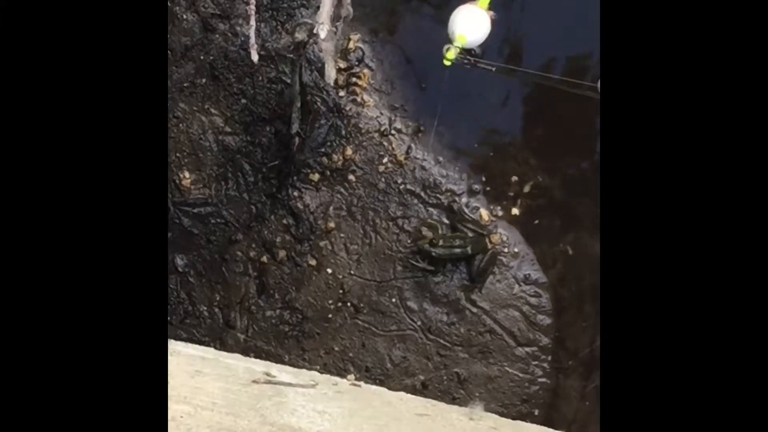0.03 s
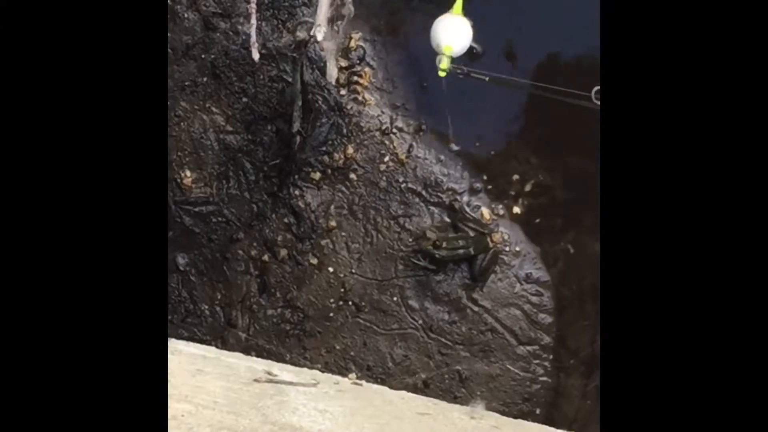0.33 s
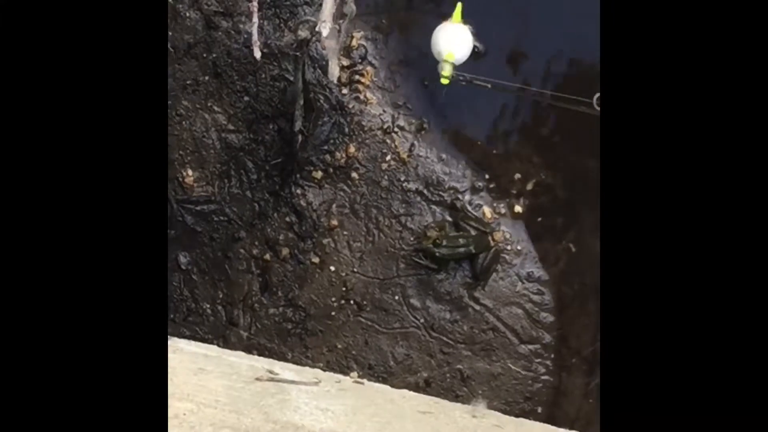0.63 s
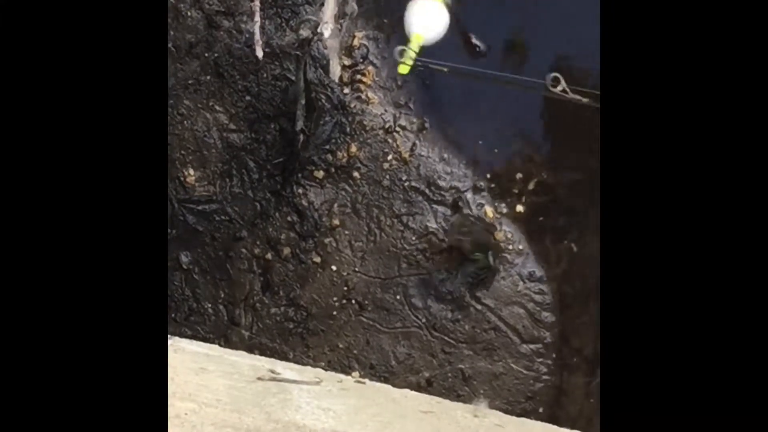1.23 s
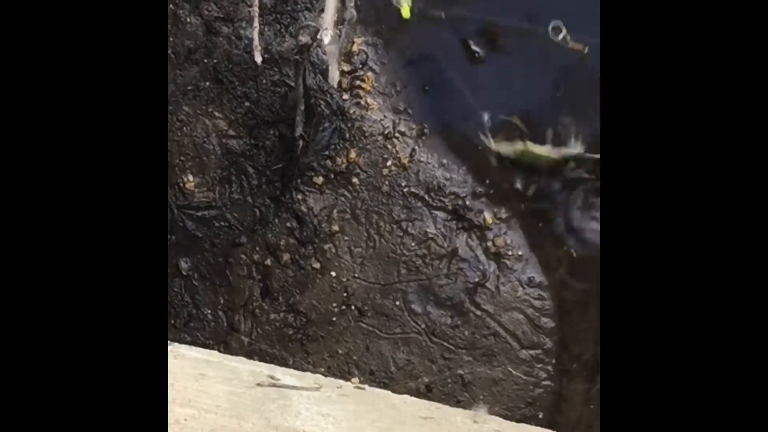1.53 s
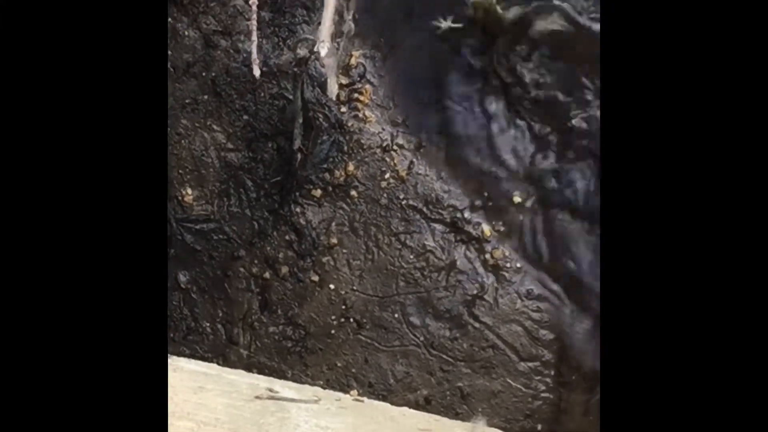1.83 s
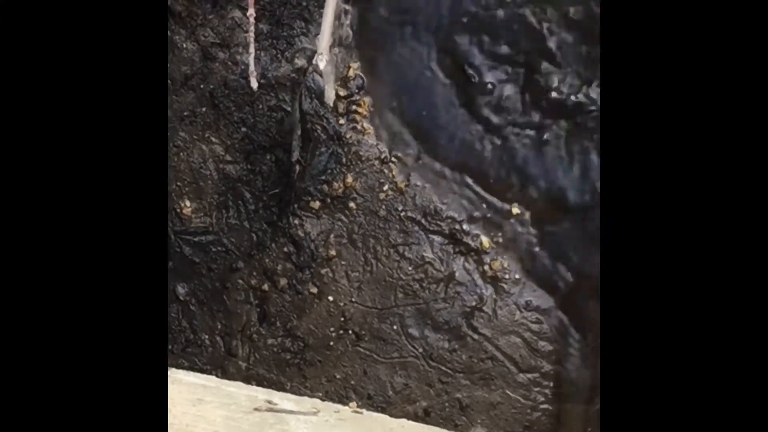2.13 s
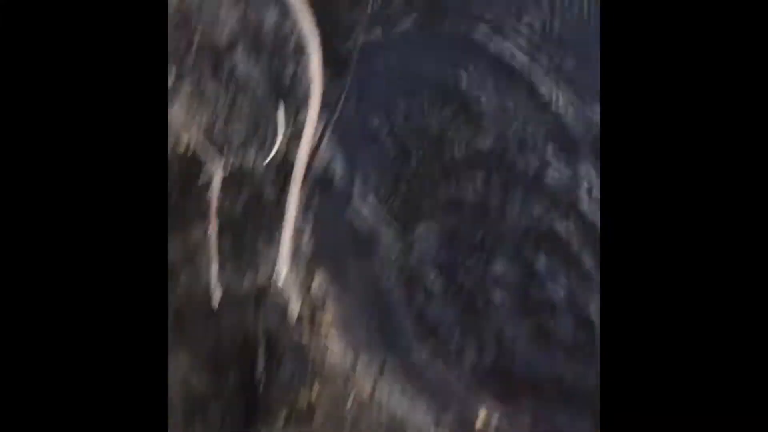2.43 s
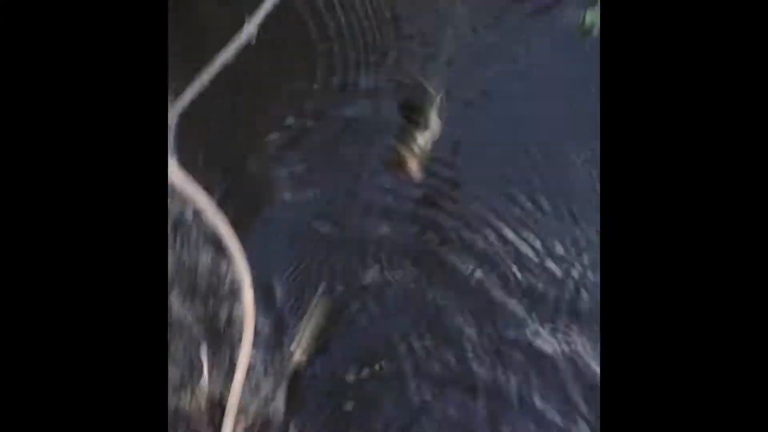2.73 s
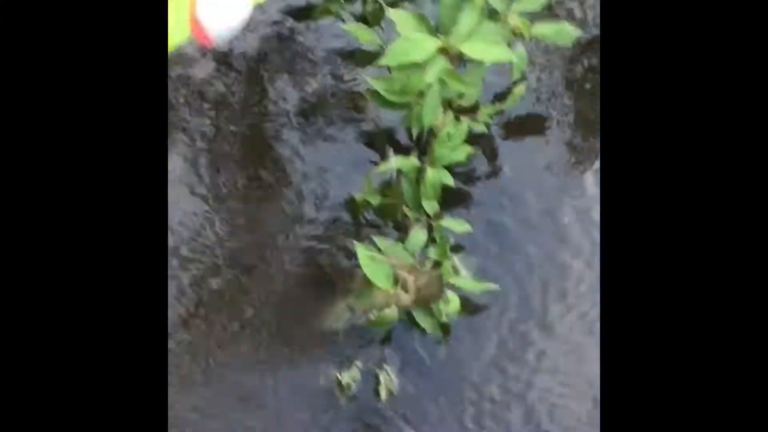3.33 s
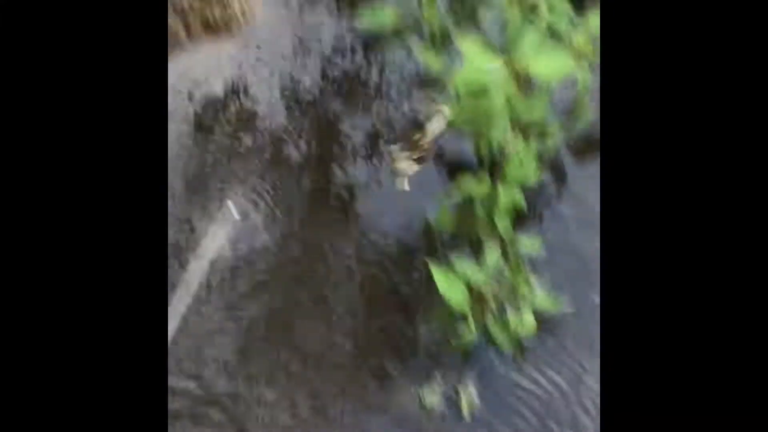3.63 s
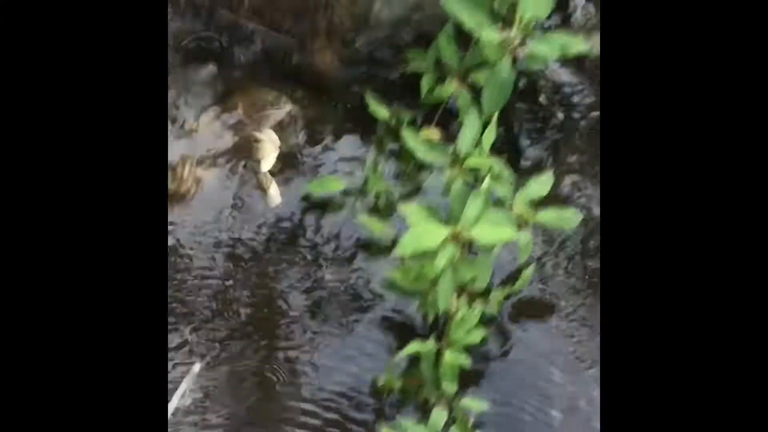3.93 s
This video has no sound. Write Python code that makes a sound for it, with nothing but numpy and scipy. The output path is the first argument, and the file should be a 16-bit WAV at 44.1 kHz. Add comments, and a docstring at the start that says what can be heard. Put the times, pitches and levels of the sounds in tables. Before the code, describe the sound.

A frog leaps into a pond with light splashy ticks and one rising plop, then skitters through wet weeds. Birds whistle during the first half, over steady outdoor hiss and dull thumps on a hand-held microphone.

```python
"""At a pond among trees, a frog leaps off a muddy bank: droplets tick as they ring tiny air pockets,
one large bubble plops with a rising pitch, small ones gurgle, and later the frog skitters through
wet weeds. A songbird whistles in gliding tones and a thinner bird trills further off, both
scattered by trunks and leaves. The hand-held microphone picks up brushing, dull thumps,
the low turbulence of soft gusts and a steady outdoor hiss."""
import sys
import numpy as np
from scipy import signal
from scipy.fft import rfft, irfft
from scipy.io import wavfile

SR = 44100
rng = np.random.default_rng(int(sys.argv[2]) if len(sys.argv) > 2 else 0)


def persist_wave(psi):
    """Save psi, clipped to +-1, as 16-bit WAV."""
    counts = np.round(np.clip(psi, -1, 1) * 32767).astype(np.int16)
    wavfile.write(sys.argv[1], SR, np.atleast_2d(counts).T)


N = 176400
T = np.arange(N) / SR


# Ticks of droplets striking the water, the first (1.482 s) being the frog's push-off from the bank: start_s,
# level_db, pitch_hz, decay_s, noise_share
DROPLETS = [(1.482, -52.5, 5450, 0.0043, 0.5), (1.5212, -40.5, 11400, 0.0014, 0.72),
            (1.525, -49, 12500, 0.0014, 0.7), (1.6485, -48, 13130, 0.0014, .8),
            (1.654, -48, 11800, 0.0032, 0.66), (1.678, -52.5, 5520, 0.0035, 0.28),
            (1.695, -49, 9700, 0.00098, 0.6), (1.7803, -39.5, 10000, 0.0011, 0.78),
            (1.7817, -30, 7410, 0.0015, 0.67), (1.7824, -36.5, 11200, 0.0018, .9),
            (1.7935, -46, 4450, 0.0032, 0.87), (1.9656, -27, 12860, 0.0005, 0.42),
            (1.9657, -37, 6890, 0.00053, 0.06), (1.9675, -37, 6850, .0016, 0.77),
            (1.970, -29.5, 6700, 0.00057, 0.03), (1.974, -43.5, 5500, 0.0036, 0.96),
            (1.9835, -41.5, 10000, 0.0023, 1), (2.039, -51.5, 6880, 0.0018, 0.3),
            (2.269, -55.5, 4380, 0.011, 0.03), (2.567, -51.5, 5520, 0.0069, 0.1),
            (2.619, -49.5, 5530, 0.0068, 0.42)]
# Spectrum of their splash noise: frequency_hz, gain_db
DROPLET_SPECTRUM = [(1500, -24), (3500, 1), (5000, -3.5), (7000, 2.5), (10000, -1.5), (13500, -0.5),
                    (16000, -6)]

def droplets():
    """Air entrainment: falling drops trap pockets so small that they ring as high ticks."""
    return splashes(DROPLETS, DROPLET_SPECTRUM, width=0.76, sag=0, spray_db=-18)


def plop():
    """Bubble resonance: a cavity pinches off with a tick and rises in pitch as it nears the surface."""
    start_s, length_s, decay_s = 2.0545, 0.053, 0.028
    start_hz, end_hz, sustain = 656, 1513, 0.23
    t = T[:int(length_s * SR)]
    progress = t / length_s
    hz = start_hz + (end_hz - start_hz) * progress ** 2.57
    envelope = (sustain + (1 - sustain) * np.exp(-(t / decay_s) ** 3)) * swell(t, length_s, 0.0042)
    tremble = undb(2 * progress * wander(245)[:len(t)])
    ring = tone(hz) * envelope * tremble
    tick = unit(resonance(rng.standard_normal(len(t)), hz=1510, width=0.68))
    tick *= np.exp(-t / 0.0016) * swell(t, length_s, 0.00025)
    tick *= np.sin(np.pi * np.minimum(t / 0.0032, 1))
    out = np.zeros(N)
    add(out, start_s, undb(-35) * ring + undb(-39) * tick)
    bank_echo = undb(-10.5) * np.roll(out, int(0.00688 * SR))
    return out + bank_echo


# Bubble clouds in the stirred water: centre_s, spread_s, bubble_count, typical_hz, bubble_level_db
BUBBLE_CLOUDS = [(1.98, .012, 16, 2400, -58), (2.004, .012, 18, 1550, -61), (2.556, .014, 22, 12500, -56),
                 (2.8, .085, 90, 1350, -67), (2.755, .015, 14, 4300, -63)]

def gurgles():
    """Damped oscillation: every bubble rings for as many cycles, so the high ones die soonest."""
    decay_cycles, pitch_spread, rise = 8.2, 0.196, 0.015
    out, t = np.zeros(N), T[:SR // 20]
    for centre_s, spread_s, count, hz, db in BUBBLE_CLOUDS:
        for when, detune, strength in rng.standard_normal((int(count), 3)):
            cycles = hz * np.exp(pitch_spread * detune) * t
            age = cycles / decay_cycles
            ring = np.exp(-age) * np.sin(2 * np.pi * cycles * (1 + rise * age))
            add(out, centre_s + spread_s * when, undb(db + 2 * strength) * ring)
    return out


# Wet slaps of the frog in the weeds: start_s, level_db, pitch_hz, decay_s, noise_share
SLAPS = [(3.679, -42, 3330, 0.0018, 0.35), (3.689, -43, 1800, .0015, 1), (3.6925, -38, 3040, 0.0027, 0.6),
         (3.7044, -32.5, 1150, 0.0013, 0.02), (3.7295, -30, 1250, 0.0017, 0.55),
         (3.7352, -33.5, 3450, 0.002, 0.6), (3.745, -35, 1060, 0.0018, 0.35),
         (3.7498, -37, 4160, 0.00083, 0.44), (3.7552, -42, 4260, .0016, .55),
         (3.795, -44.5, 3000, 0.00092, 0.8)]
# Two kicks that churn the water: centre_s, half_width_s, level_db
KICKS = [(3.689, 0.039, -55.5), (3.748, 0.028, -53.5)]
# Spectrum of the slap and slosh noise: frequency_hz, gain_db
SLAP_SPECTRUM = [(400, -22), (800, -6), (1150, 3), (2000, -1.5), (3500, 0.5), (6000, -8.5), (7200, -18.5),
                 (16000, -37)]

def skitter():
    """Cavity resonance: each slap sinks in pitch as its pocket opens, over two grainy sloshes."""
    envelope = sum(undb(db) * np.exp(-((T - centre_s) / width_s) ** 2) for centre_s, width_s, db in KICKS)
    slosh = envelope * grainy_noise(SLAP_SPECTRUM, depth_db=3.8, rate_hz=400)
    return splashes(SLAPS, SLAP_SPECTRUM, width=7.5, sag=0.33, spray_db=-22) + slosh


def splashes(impacts, spectrum, width, sag, spray_db):
    """Impact excitation: an air pocket rings, noise bursts around its pitch and a short spray fizzes."""
    rise_s, sag_s, spray_decay_s = 0.00037, 0.0067, 0.014
    out, t = np.zeros(N), T[:SR // 10]
    splash_noise = noise(spectrum)
    fizz = grainy_noise(spectrum, depth_db=7.2, rate_hz=1200)
    for k, (start_s, db, hz, decay_s, noise_share) in enumerate(impacts):
        stretch = slice(k * len(t), (k + 1) * len(t))
        envelope = np.minimum(t / rise_s, 1) * np.exp(-np.maximum(t - rise_s, 0) / decay_s)
        ring = tone(hz * (1 + sag * (np.exp(-t / sag_s) - 0.7)))
        burst = unit(resonance(splash_noise[stretch], hz, width))
        hit = envelope * ((1 - noise_share) * ring + 0.6 * noise_share * burst)
        spray = noise_share * undb(spray_db) * np.exp(-t / spray_decay_s) * fizz[stretch]
        add(out, start_s, undb(db) * (hit + spray))
    return out


# Whistled notes of the songbird: start_s, length_s, start_hz, middle_hz, end_hz, level_db
WHISTLES = [(-.02, 0.071, 2550, 2580, 2842, -56), (.05, 0.068, 2790, 2600, 2524, -65),
            (.362, 0.11, 2830, 2494, 2573, -50.5), (.475, 0.012, 2694, 2547, 2180, -46.5),
            (.505, 0.035, 2476, 2515, 2310, -53), (.545, 0.21, 3050, 3158, 3105, -58),
            (.6, 0.03, 2485, 2774, 2785, -47.5), (.978, 0.02, 2480, 2670, 2880, -55),
            (1.002, 0.019, 3160, 3330, 3490, -54.5), (1.024, 0.042, 2825, 2810, 2730, -46),
            (1.06, 0.018, 2690, 2353, 1993, -50.5), (1.112, 0.058, 2648, 2650, 2624, -46),
            (1.164, 0.099, 2153, 2142, 2145, -55), (1.563, 0.0072, 2150, 2135, 2090, -52),
            (1.574, 0.0076, 1683, 1730, 1840, -47.5), (1.589, 0.027, 2360, 2326, 2333, -52.5),
            (1.619, .055, 2518, 2787, 2690, -44), (1.733, 0.014, 2600, 2780, 2803, -54),
            (1.75, 0.0239, 2780, 2745, 2504, -45.5), (1.775, 0.034, 2476, 2207, 2080, -50.5),
            (1.857, 0.011, 1658, 1900, 2210, -46.5)]

def songbird():
    """Direct field: the whistles of a near bird stand above their reflections."""
    voice = birdsong(WHISTLES, waver=0.16, waver_hz=221, flutter_db=2.5)
    return trees(voice, t60_s=0.58, wet_db=-6.0)


# Thin notes of the far bird: start_s, length_s, start_hz, middle_hz, end_hz, level_db
TRILLS = [(.232, 0.038, 6200, 5950, 5880, -61.5), (.272, 0.03, 5700, 5250, 4900, -61.5),
          (.372, 0.033, 6900, 6920, 7020, -70), (.408, 0.049, 6300, 5640, 5550, -57),
          (.458, .042, 5300, 4730, 4640, -63), (.56, .03, 6800, 7050, 7320, -62.5),
          (.59, .045, 6200, 5600, 5460, -59), (.635, 0.04, 5200, 4700, 4300, -57.5),
          (.752, 0.041, 6600, 6780, 6850, -63), (.842, .04, 5700, 6470, 6950, -61)]

def far_bird():
    """Reverberant field: the reflections of a distant, raspy trill outweigh its direct sound."""
    voice = birdsong(TRILLS, waver=0.5, waver_hz=900, flutter_db=1.5)
    return trees(voice, t60_s=0.61, wet_db=1.5)


def birdsong(notes, waver, waver_hz, flutter_db):
    """Frequency modulation: notes glide through three pitches; slides start raspy and settle."""
    crescendo_db, held_roughness, slur_s = 1.5, 0.03, 0.00398
    hz, level, roughness = np.zeros((3, N))
    for start_s, length_s, start_hz, middle_hz, end_hz, db in notes:
        on = (T >= start_s) & (T < start_s + length_s)
        progress = (T[on] - start_s) / length_s
        glide = np.polyfit([0, 0.5, 1], [start_hz, middle_hz, end_hz], 2)
        hz[on] = np.polyval(glide, progress)
        level[on] = undb(db + crescendo_db * (progress - 1))
        roughness[on] = held_roughness + abs(start_hz - end_hz) / middle_hz * (1 - progress)
    hz = np.interp(T, T[level > 0], hz[level > 0])  # the pitch bridges the rests
    slur = signal.windows.hann(int(2 * slur_s * SR))
    hz, level = (signal.fftconvolve(curve, slur / slur.sum(), mode="same") for curve in (hz, level))
    whistle = tone(hz * (1 + waver * roughness * wander(waver_hz)))
    flutter = undb(flutter_db * wander(54))
    return np.sqrt(2) * level * flutter * whistle


def trees(x, t60_s, wet_db):
    """Multiple scattering: reflections from trunks and leaves thicken into a soft tail."""
    leaf_hz = 2010  # lower notes pass the leaves and hardly echo
    t = T[:SR]
    echoes_per_s = 450 + 5500 * t
    echoes = rng.standard_normal(SR) * (rng.random(SR) < echoes_per_s / SR)
    tail = echoes * np.exp(-np.log(1000) * t / t60_s) * (1 - np.exp(-t / 0.008))
    tail /= np.sqrt(np.sum(tail ** 2))
    scattered = signal.sosfilt(signal.butter(4, leaf_hz, "high", fs=SR, output="sos"), x)
    return x + undb(wet_db) * signal.fftconvolve(scattered, tail)[:N]


# Knocks of the hand on the microphone: start_s, level_db, pitch_hz
THUMPS = [(1.73, -35.5, 78), (1.734, -39.5, 149), (1.983, -40.5, 57.8), (3.182, -48.5, 61.3),
          (3.226, -36.5, 115.5), (3.245, -41, 66.6), (3.736, -39, 77), (3.761, -35.5, 89.5),
          (3.769, -34, 165), (3.778, -41.5, 188), (3.79, -46, 293), (3.796, -31, 67.4), (3.828, -34, 129),
          (3.838, -34, 233), (3.862, -41.5, 130), (3.881, -45.5, 58)]

def thumps():
    """Structure-borne sound: each knock swells within a cycle and dies away in a few more."""
    rise_cycles = 0.9
    out, t = np.zeros(N), T[:SR // 5]
    for start_s, db, hz in THUMPS:
        age = hz * t / rise_cycles
        envelope = (age * np.exp(1 - age)) ** 2
        add(out, start_s, undb(db) * envelope * np.sin(2 * np.pi * hz * t))
    return out


# Rubs against the microphone housing: centre_s, width_s (Gaussian sigma), level_db
BRUSHES = [(2.327, 0.0029, -58), (2.343, 0.0079, -50.5), (2.546, 0.0072, -56.5), (2.569, 0.0052, -54)]
# Spectrum of the rubbing: frequency_hz, gain_db
BRUSH_SPECTRUM = [(800, -16), (2500, 1), (4500, -8), (5100, 0), (5550, 7.5), (6000, 0.5), (7000, -1.5),
                  (7900, 1), (9000, -8), (10300, -7), (12000, 0.5), (16000, -10)]

def brushes():
    """Friction noise: short grainy rubs on the housing as the microphone swings round."""
    envelope = sum(undb(db) * np.exp(-0.5 * ((T - centre_s) / width_s) ** 2)
                   for centre_s, width_s, db in BRUSHES)
    return envelope * grainy_noise(BRUSH_SPECTRUM, depth_db=2.0, rate_hz=900)


# Gusts buffeting the microphone: start_s, length_s, level_db, centre_hz
GUSTS = [(-.02, 0.23, -52.5, 67.5), (0.211, 0.047, -48.5, 55.6), (0.542, 0.061, -47, 61),
         (0.615, .11, -55, 59.5), (1.322, 0.079, -52.5, 57), (1.43, 0.14, -46.5, 61),
         (1.611, 0.05, -52.5, 107.3), (1.659, 0.19, -54.5, 70.6), (1.877, 0.081, -60, 69.7),
         (2.012, 0.066, -56.5, 60.5), (2.159, 0.045, -58.5, 63.6), (2.512, 0.07, -60.5, 63.3),
         (2.739, 0.092, -58.5, 75.5)]

def wind():
    """Turbulence: each gust is a puff of low pressure fluctuations around its own frequency."""
    out, f = np.zeros(N), np.fft.rfftfreq(SR, 1 / SR)
    for start_s, length_s, db, hz in GUSTS:
        t = T[:int(length_s * SR)]
        cutoff_hz = 3.93 * hz
        eddies = irfft(rfft(rng.standard_normal(SR)) / (1 + (f / cutoff_hz) ** 8), SR)
        puff = resonance(eddies, hz, width=0.48)[:len(t)]
        add(out, start_s, undb(db) * unit(puff * swell(t, length_s, edge_s=0.014)))
    return out


# Spectrum of the outdoor hiss: frequency_hz, gain_db
HISS_SPECTRUM = [(15, -29), (25, -17), (45, -1), (70, -5), (105, -5), (240, -11), (320, -10.5),
                 (470, -16.5), (1200, -19.5), (2600, -18), (4200, -20.5), (6500, -23.5), (8000, -27.5),
                 (9500, -28.5), (10500, -33.5), (13200, -32.5), (16000, -38.5)]
# Its slow change in level: time_s, level_db
HISS_LEVEL = [(0, -64), (1.3, -62.5), (2.2, -63), (2.8, -61), (4, -60)]

def outdoor_hiss():
    """Ambient noise: distant leaves and open air merge into a broad hiss that barely swells."""
    level_db = np.interp(T, *np.array(HISS_LEVEL).T)
    return noise(HISS_SPECTRUM) * undb(level_db + 0.43 * wander(8.5))


def noise(spectrum):
    """Spectral shaping: white noise is coloured by a curve and scaled to rms 1."""
    hz, db = np.array(spectrum).T
    f = np.maximum(np.fft.rfftfreq(N, 1 / SR), 1)
    gain = undb(np.interp(np.log(f), np.log(hz), db))
    return unit(irfft(rfft(rng.standard_normal(N)) * gain, N))


def grainy_noise(spectrum, depth_db, rate_hz):
    """Amplitude modulation: a fast random level breaks noise into grains, at rms 1."""
    return unit(noise(spectrum) * undb(depth_db * wander(rate_hz)))


def wander(rate_hz):
    """Low-pass noise: a random drift of rms 1."""
    f = np.fft.rfftfreq(N, 1 / SR)
    return unit(irfft(rfft(rng.standard_normal(N)) / (1 + (f / rate_hz) ** 4), N))


def resonance(x, hz, width):
    """Band-pass response: the width is a share of the centre frequency."""
    f = np.maximum(np.fft.rfftfreq(len(x), 1 / SR), 1)
    return irfft(rfft(x) / (1 + ((f / hz - hz / f) / width) ** 2), len(x))


def tone(hz):
    """Phase integration: a sine follows a changing frequency."""
    return np.sin(2 * np.pi * np.cumsum(hz) / SR)


def swell(t, length_s, edge_s):
    """Raised-cosine window: a smooth rise, hold and fall."""
    return np.sin(np.pi / 2 * np.clip(np.minimum(t, length_s - t) / edge_s, 0, 1)) ** 2


def undb(db):
    """Decibels to amplitude ratio."""
    return 10 ** (np.asarray(db) / 20)


def unit(x):
    """Normalisation to rms 1."""
    return x / np.sqrt(np.mean(x ** 2) + 1e-20)


def add(out, start_s, x):
    """Superposition: a sound joins the mix at its start time."""
    i = int(round(start_s * SR))
    x, i = x[max(-i, 0):], max(i, 0)
    out[i:i + len(x)] += x[:max(N - i, 0)]


def scene():
    """Superposition: frog, birds, microphone noises and hiss sum in one channel."""
    frog = droplets() + plop() + gurgles() + skitter()
    birds = songbird() + far_bird()
    microphone = thumps() + brushes() + wind()
    return (frog + birds + microphone + outdoor_hiss())[None]


def record(dry):
    """Band limiting: the recorder cuts the deepest rumble and the highest treble."""
    low_hz, top_hz = 30, 15900
    high_pass = signal.butter(2, low_hz, "high", fs=SR, output="sos")
    low_pass = signal.ellip(10, 0.2, 70, top_hz, fs=SR, output="sos")
    return signal.sosfilt(low_pass, signal.sosfilt(high_pass, dry))


dry = scene()
out = record(dry)
persist_wave(out)
```